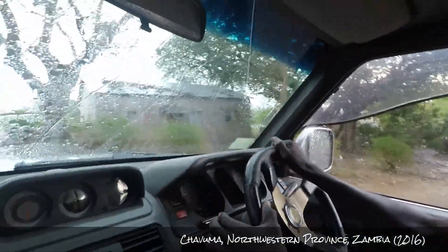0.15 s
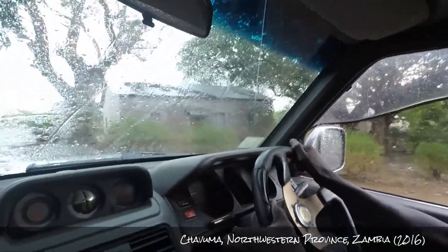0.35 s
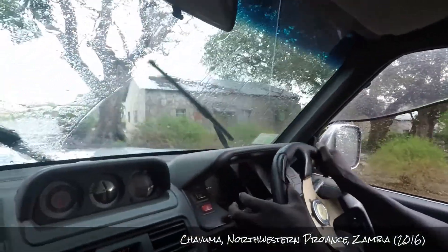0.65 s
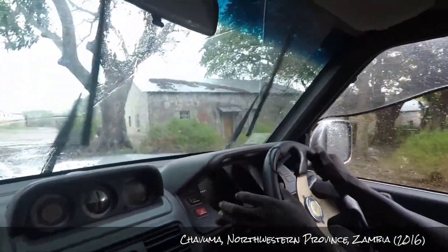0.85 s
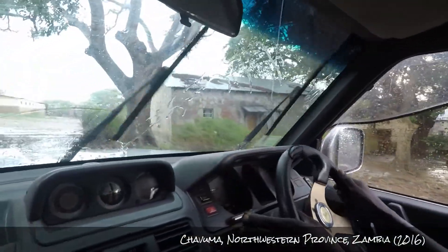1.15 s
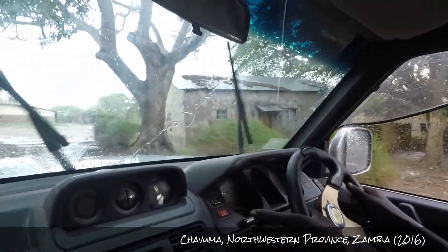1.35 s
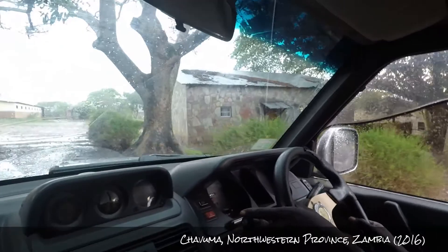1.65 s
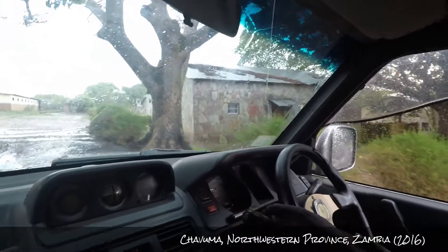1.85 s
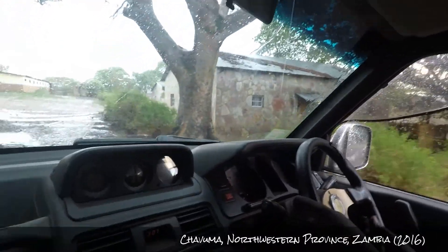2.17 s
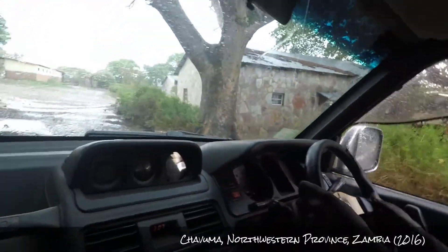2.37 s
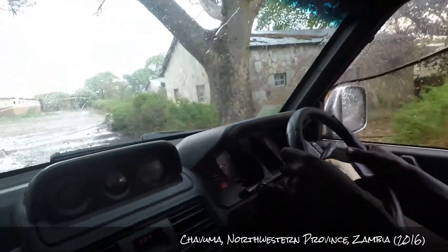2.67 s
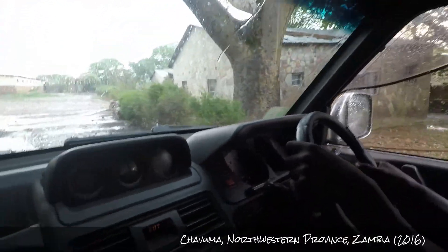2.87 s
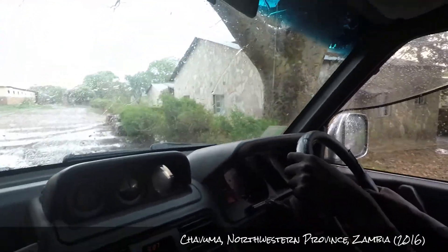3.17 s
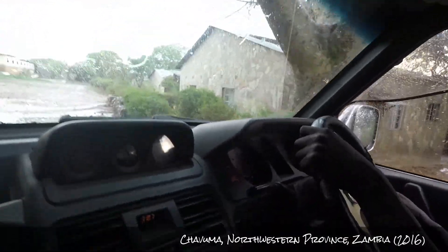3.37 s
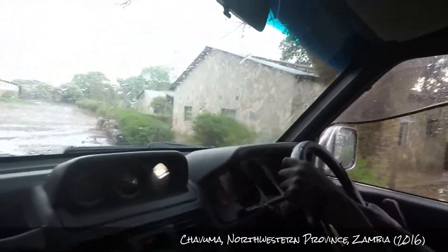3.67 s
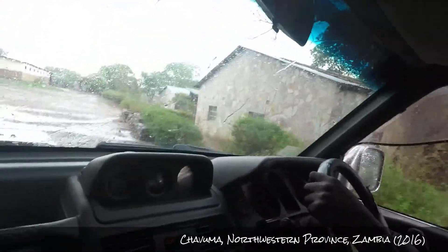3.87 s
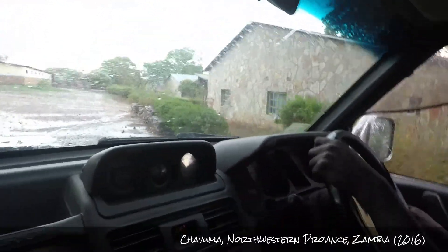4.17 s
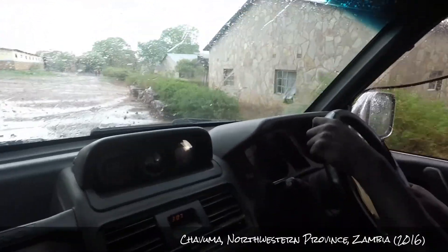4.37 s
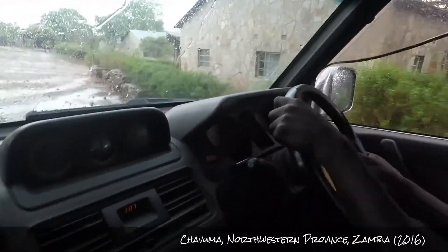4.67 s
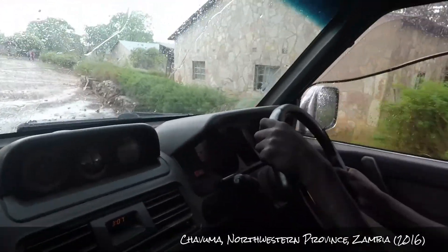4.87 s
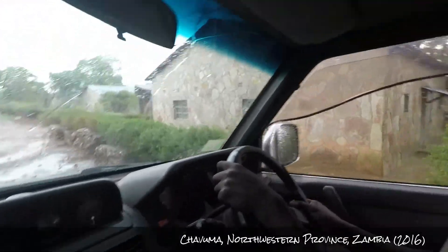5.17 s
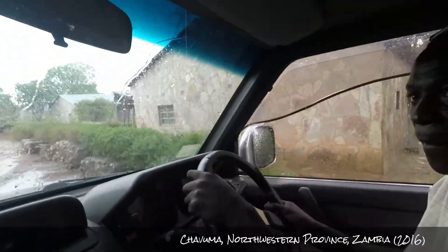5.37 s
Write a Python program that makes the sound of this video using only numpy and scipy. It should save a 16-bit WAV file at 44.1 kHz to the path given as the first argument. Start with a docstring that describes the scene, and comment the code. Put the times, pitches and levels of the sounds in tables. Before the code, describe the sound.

The cabin of a car rolling slowly over a wet dirt track, heard from a handheld camera at the passenger seat. A steady low engine drone around 50 Hz, boomy body rumble and tyre noise lie over soft, wide rain patter. Big drops tick at 0.03 and 0.75 s; a wiper taps softly at 1.2 s and flicks water just before 1.4 s. Sparse plastic rattles and faint high squeaks follow. From about 2.1 s the engine eases lower and weaker, with rut thuds near 2.45 s. A double dashboard knock at 2.8 s opens a busy run of clatter until 3.4 s. At 3.72 s a hard click and deep falling thump hit the camera, with body heave and water splash; all sound ducks abruptly, then recovers over almost two seconds. Rattles and a knock follow around 3.8 s, low thuds and puddle splashes at 4.6-4.9 s, smaller splashes near 5.4 s, and final rattles at 5.5 s.

```python
"""A low engine drone under pattering rain is heard first, inside a car rolling slowly over a dirt track.
The drone is a sum of sinusoidal orders with pulsed noise; rain, splashes and tyres are shaped noise.
Ruts, knocks and trim add decaying modes, chattering noise bursts and gliding stick-slip whistles.
A hard jolt knocks the camera: damped modes and a falling thump drive its limiter, which ducks everything
at once and takes almost two seconds to come back up."""
import sys
import numpy as np
from scipy import signal
from scipy.fft import rfft, irfft, next_fast_len
from scipy.io import wavfile
from scipy.ndimage import uniform_filter1d, minimum_filter1d

SR = 44100
rng = np.random.default_rng(int(sys.argv[2]) if len(sys.argv) > 2 else 0)


def pcm_store(signal):
    """Save signal as 16-bit PCM."""
    levels = np.round(np.clip(np.atleast_2d(signal), -1, 1) * 32767)
    wavfile.write(sys.argv[1], SR, levels.astype(np.int16).T)


N = 243873
T = np.arange(N) / SR  # t/s

# Spectra give a relative shape: the coloured noise is normalised afterwards.
# Cabin sound field, side relative to mid: f/Hz, level/dB
CABIN_WIDTH = [(60, -23), (170, -19.5), (300, -16), (510, -8), (860, -2.5), (1470, -2), (2500, -4.5),
               (4250, -7), (6000, 1.5), (8000, 1.5)]
# Cabin's lean to one microphone, left minus right: f/Hz, level/dB
CABIN_LEAN = [(120, 0), (280, -0.5), (520, -2), (1000, -0.6), (2000, 1.5), (4000, 1.5), (8000, 0)]

# Water reaching the body, rain and steady wheel spray, before the jolt's splash: t/s, level/dB
WATER = [(0, -42), (0.75, -42), (0.95, -44), (2.05, -42.5), (2.82, -43), (3.05, -40.5), (3.42, -40.5),
         (3.65, -42), (4.1, -42), (4.5, -42), (5.3, -44), (5.53, -40)]
# Spectrum of rain: f/Hz, level/dB per Hz
RAIN_SPECTRUM = [(200, -9), (600, 5.5), (1000, 7.5), (1250, 7), (1450, 9.5), (2000, 5.5), (2800, 3),
                 (4300, 1), (5700, 0.5), (7000, -7.5), (8200, -16.5), (10500, -21), (12000, -27),
                 (15000, -43)]
# Water thrown up by the jolt: rise of level/dB, settling t/s
SPLASH_DB, SPLASH_S = 12.5, 0.12

# Engine, eased off over the rough stretch: t/s, mean firing rate f/Hz, relative level/dB
ENGINE = [(0, 52, -12), (1.8, 51.7, -13.3), (2.1, 49.7, -12.5), (2.45, 41, -16), (2.8, 40, -22),
          (3.6, 38, -22), (4.4, 51, -26), (5.53, 52, -23)]
# Engine orders (half orders: unequal cylinders; 4.15: belt-driven fan): multiple of firing rate, level/dB
ENGINE_ORDERS = [(1, -1.5), (2, -18.5), (3, -35), (4.15, -26), (6, -37), (7, -38), (8, -40), (9, -41),
                 (11, -38), (11.5, -42), (13, -41), (14, -43.5)]
# Spectrum of combustion noise: f/Hz, level/dB per Hz
COMBUSTION_SPECTRUM = [(100, -8.5), (220, 2.5), (400, -6.5), (600, -9.5), (900, -14), (2000, -20.5),
                       (8000, -81)]

# Roughness of the track, over smooth ground: t/s, level/dB
ROUGHNESS = [(0, -0.5), (1.2, 0.4), (1.8, 1), (2.78, 0), (2.92, 5), (3.3, 4), (3.6, 1.5), (4.1, 0),
             (4.8, 1.5), (5.53, -1)]
# Spectrum of the body's boom: f/Hz, level/dB per Hz
BOOM_SPECTRUM = [(10, -22.5), (15, -9.5), (22, 1), (31, 3.5), (42, -3), (60, -3.5), (90, -19.5), (200, -72),
                 (2000, -130)]
# Spectrum of the tyres' rumble: f/Hz, level/dB per Hz
TYRE_SPECTRUM = [(12, -23), (35, 0.5), (70, 2.5), (130, 0.5), (180, -8.5), (260, -16), (370, -18.5),
                 (550, -25), (1000, -33.5), (2500, -68.5), (10000, -110)]
BOOM_DB, TYRE_DB = -15.5, -23  # on smooth ground, level/dB
# Heaving of the body after the jolt: rise of level/dB, settling t/s
HEAVE_DB, HEAVE_S = 6.5, 0.11

# Puddles splashing under the wheels: t/s, decay t/s, level/dB
PUDDLES = [(4.587, 0.037, -36.5), (4.71, 0.02, -39.5), (4.745, 0.018, -38.5), (4.791, 0.056, -41.5),
           (4.9, 0.024, -38.5), (5.357, 0.031, -43.5), (5.396, 0.024, -42)]
# Spectrum of a splash: f/Hz, level/dB per Hz
SPLASH_SPECTRUM = [(300, -8.5), (900, 12.5), (2500, 10.5), (5800, 7.5), (7500, -4.5), (10500, -27),
                   (15000, -56)]
# Big single drops on the windscreen: t/s, level/dB
BIG_DROPS = [(0.033, -33.5), (0.757, -34)]

# Water flicked over the glass by the returning blades: t/s, relative level/dB
WIPER_FLICKS = [(1.338, -32), (1.389, -30.5)]
# Spectrum of a flick: f/Hz, level/dB per Hz
FLICK_SPECTRUM = [(3000, -16), (4400, 0), (4900, 0), (5400, 11), (6000, 1), (6800, -11), (8000, -32),
                  (14000, -65)]
# Spectrum of the tap as the blades flip over: f/Hz, level/dB per Hz
FLIP_SPECTRUM = [(200, 11), (330, 22.5), (600, 6), (1400, 6), (2200, 1.5), (3000, -10.5), (6000, -22),
                 (14000, -58)]
FLIP_S, FLIP_DB = 1.208, -25.5  # top of the stroke: t/s, level/dB

# Trim rubbing on trim: t/s, length t/s, mid-glide f/Hz, fall in f/Hz, relative level/dB
SQUEAKS = [(1.872, .05, 4075, 20, -43), (2.306, .03, 4180, 60, -41), (2.873, .028, 4080, 30, -38.5),
           (2.901, .03, 4080, 50, -36), (3.511, .026, 4190, 70, -30.5), (3.533, .017, 4070, 170, -28.5),
           (3.77, .022, 4190, 40, -32.5), (4.625, .048, 4085, 70, -33.5), (4.781, .022, 4090, 0, -38.5),
           (5.048, .026, 4170, -130, -41.5)]

# Loose trim shaken by harder bumps: t/s, level/dB, decay t/s, bright edge against clatter level/dB
RATTLES = [(0.675, -32, 0.011, -9), (1.328, -37, 0.0053, -20), (1.364, -29, 0.013, -24),
           (1.576, -28, 0.0051, -16.5), (2.071, -28, 0.016, -14), (2.384, -26.5, 0.032, -14.5),
           (2.498, -27.5, 0.011, -17.5), (2.877, -28.5, .01, -17), (2.897, -27.5, 0.0098, -17),
           (2.947, -23, 0.016, -14), (3.002, -21.5, 0.013, -18.5), (3.119, -22, 0.0085, -16),
           (3.173, -22.5, 0.011, -19), (3.218, -26, 0.016, -15.5), (3.28, -22, 0.014, -17.5),
           (3.336, -24, 0.012, -23), (3.364, -30, 0.01, -11), (3.405, -28, 0.012, -18),
           (3.754, -22, .014, -9), (3.806, -17.5, 0.01, -14), (3.847, -26, 0.01, -22),
           (3.882, -26.5, 0.028, -8), (4.005, -34.5, 0.034, -25), (4.855, -31.5, 0.033, -14),
           (4.898, -33, 0.013, -13), (4.994, -32.5, 0.0056, -10), (5.102, -29.5, 0.033, -11.5),
           (5.186, -31, 0.016, -12), (5.489, -28.5, 0.0065, -15), (5.514, -23.5, 0.0054, -28)]
# Spectrum of dull clatter: f/Hz, level/dB per Hz
CLATTER_SPECTRUM = [(150, 13), (400, 6), (900, 2), (1900, -1), (2800, -10), (4500, -24), (8000, -64.5),
                    (14000, -61)]
# Spectrum of a bright edge: f/Hz, level/dB per Hz
EDGE_SPECTRUM = [(1500, -20.5), (3000, 9), (4500, 2.5), (5800, 8), (7500, -10.5), (9000, -31), (15000, -50)]
# Light random rattles: mean number per second, level/dB on smooth ground, spread of level/dB
CHATTER_PER_S, CHATTER_DB, CHATTER_SPREAD_DB = 6.6, -37, -2
LIGHT_EDGE_DB = -21.5  # bright edge of a light rattle against its clatter, level/dB

# Something loose knocking on the dashboard: t/s, level/dB
KNOCKS = [(2.8234, -16.5), (2.832, -15.5), (3.225, -28), (3.439, -21.5), (3.853, -23)]
# Dashboard modes: f/Hz, t60 t/s, level/dB
DASH_MODES = [(335, 0.042, -12), (410, 0.062, -3), (583, 0.033, -7), (707, 0.064, -12), (906, 0.029, -3.5),
              (1135, 0.13, -10), (1426, 0.033, -10.5)]
# Wheels dropping into ruts: t/s, thud f/Hz, relative level/dB
RUTS = [(2.418, 138, -9), (2.499, 68.5, -1), (3.126, 78, -21), (3.549, 150.2, -10), (4.011, 154, -8.5),
        (4.274, 136, -14), (4.665, 69, 0), (4.885, 109.6, -5)]

# Modes of the knocked camera case: f/Hz, t60 t/s, relative level/dB
CASE_MODES = [(333, 0.021, -8), (600, 0.0093, -12), (1083, 0.008, -20), (1470, 0.03, -15.5),
              (2530, .008, -33), (5300, 0.006, -28.5), (5950, 0.012, -26.5)]
JOLT_S, BOUNCE_S, THUMP_S = 3.7175, 3.7202, 3.7226  # t/s
SWELL_S = 0.087  # from the jolt to the top of heave and splash, t/s
TOP_HZ = 15500  # upper limit of the output, f/Hz


def undb(db):
    """Definition of the decibel: level to amplitude ratio."""
    return 10 ** (np.asarray(db) / 20)


def unit(x):
    """Normalisation to an rms amplitude of 1."""
    return x / np.sqrt(np.mean(x ** 2))


def curves(table):
    """Linear interpolation of each column through time."""
    s, *columns = np.transpose(table)
    return [np.interp(T, s, column) for column in columns]


def colour(x, points):
    """Zero-phase filtering: levels run straight between the points over log frequency."""
    hz, db = np.transpose(points)
    size = next_fast_len(N)
    bins = np.maximum(np.fft.rfftfreq(size, 1 / SR), 1)
    gain = undb(np.interp(np.log(bins), np.log(hz), db))
    return irfft(rfft(x, size) * gain, size)[..., :N]


def noise():
    """Statistical independence: two unrelated white noises."""
    return rng.standard_normal((2, N))


def cabin(pair, points):
    """Diffuse-field coherence: mid and side make bass alike in both channels and treble diffuse."""
    mid, side = colour(pair, points)
    side = colour(side, CABIN_WIDTH)
    left = colour(mid + side, [(hz, db / 2) for hz, db in CABIN_LEAN])
    right = colour(mid - side, [(hz, -db / 2) for hz, db in CABIN_LEAN])
    return np.array([left, right]) / np.std(mid)


def pan(db):
    """Interchannel level difference, left minus right, split evenly between the channels."""
    return undb(np.array([[db], [-db]]) / 2)


def walk(rate):
    """Low-pass randomness: held random steps, rate per second, smoothed twice and scaled to rms 1."""
    k = int(SR / rate)
    steps = rng.standard_normal(N)[np.arange(N) // k]
    return unit(uniform_filter1d(uniform_filter1d(steps, k), k))


def burst(start, rise, decay):
    """Exponential relaxation: a linear rise to 1, then decay with the given time constant."""
    age = T - start
    return np.clip(age / rise, 0, 1) * np.exp(-np.clip((age - rise) / decay, 0, 60))


def grains(per_s, spread_db):
    """Random impulse trains: two unrelated streams of unequal tiny clicks, rms 1."""
    sizes = undb(spread_db * np.minimum(rng.exponential(size=(2, N)), 5))
    struck = rng.random((2, N)) < per_s / SR
    return unit(struck * sizes * np.sign(noise()))


def tap(points, start, rise, decay):
    """Impulsive noise: one short coloured burst with the rms of its envelope."""
    shape = burst(start, rise, decay)
    return unit(cabin(noise(), points) * shape) * np.sqrt(np.mean(shape ** 2))


def ring(start, hz, t60):
    """Damped free vibration: one struck mode falling 60 dB in t60 seconds."""
    out, first = np.zeros(N), int(start * SR) + 1
    age = T[first:first + int(2 * t60 * SR)] - start
    out[first:first + len(age)] = np.sin(2 * np.pi * hz * age) * np.exp(-np.log(1000) * age / t60)
    return out


def rain(water_db, drops_per_s=550, spread_db=3.0, ring_s=0.0032):
    """Random impact excitation: unequal drops tap roof and glass over the wash of countless finer ones."""
    taps = grains(drops_per_s, spread_db)
    age = T[:1024]
    panel = rng.standard_normal((2, len(age))) * np.exp(-age / ring_s)
    # the panels smear each tap in time and leave its colour flat
    response = rfft(panel)
    smear = irfft(response / np.abs(response))
    patter = unit(signal.fftconvolve(taps, smear, axes=1)[:, :N])
    water = undb(-5.5) * patter + undb(-1.5) * noise()
    return cabin(water, RAIN_SPECTRUM) * undb(water_db + 0.56 * walk(24.45))


def engine(wobble=0.0026, load_db=0.34, combustion_db=-26):
    """Harmonic synthesis: a four-cylinder's orders follow the crankshaft; each firing puffs noise."""
    hz, db = curves(ENGINE)
    phase = 2 * np.pi * np.cumsum(hz * (1 + wobble * walk(12))) / SR
    note = np.zeros(N)
    for multiple, order_db in ENGINE_ORDERS:
        amplitude = undb(order_db + load_db * walk(7.92))
        note += amplitude * np.sin(multiple * phase + rng.uniform(0, 2 * np.pi))
    combustion = cabin(noise(), COMBUSTION_SPECTRUM) * (1 + 0.4 * np.cos(phase))
    return (np.sqrt(2) * note * pan(2.1) + undb(combustion_db) * combustion) * undb(db)


def body_boom(shake_db):
    """Forced vibration: ground roughness makes the sprung body boom as low-frequency noise."""
    return cabin(noise(), BOOM_SPECTRUM) * undb(BOOM_DB + shake_db) * pan(1.8)


def tyre_rumble(shake_db):
    """Roughness excitation: tyre noise surges over the uneven ground."""
    return cabin(noise(), TYRE_SPECTRUM) * undb(TYRE_DB + shake_db + 1.53 * walk(21.7)) * pan(0.77)


def puddle_splashes(rise_s=0.011, drops_per_s=3000):
    """Superposed impacts: puddles throw short showers of droplets at the body."""
    showers = sum(undb(db) * burst(s, rise_s, decay) for s, decay, db in PUDDLES)
    return showers * cabin(grains(drops_per_s, spread_db=0.5), SPLASH_SPECTRUM)


def big_drops(tap_s=0.0021):
    """Single impact: a big drop ticks on the glass as a brief bright noise."""
    ticks = sum(undb(db) * burst(s, 0.0009, tap_s) for s, db in BIG_DROPS)
    return ticks * cabin(noise(), EDGE_SPECTRUM)


def wiper(flick_db=-1.0):
    """Elastic reversal: the rubber lips flip over with a soft tap, then flick water off the glass."""
    flip = tap(FLIP_SPECTRUM, FLIP_S, 0.005, 0.01)
    flicks = sum(undb(db) * tap(FLICK_SPECTRUM, s, 0.0018, 0.0035) for s, db in WIPER_FLICKS)
    return undb(FLIP_DB) * flip + undb(flick_db) * flicks


def squeaks(waver_hz=16, third_db=-33, flutter_db=0.5):
    """Stick-slip friction: short whistles with a faint third harmonic bite quickly, glide and fade."""
    out = np.zeros(N)
    waver, flutter = waver_hz * walk(240), undb(flutter_db * walk(200))
    for s, length, hz, fall_hz, db in SQUEAKS:
        along = np.clip((T - s) / length, 0, 1)
        phase = 2 * np.pi * np.cumsum(hz + fall_hz * (0.5 - along) + waver) / SR
        grip = np.interp(along, [0, 0.25, 1], [0, 1, 0]) ** 0.8
        out += undb(db) * grip * (np.sin(phase) + undb(third_db) * np.sin(3 * phase))
    return out * flutter * pan(-4.0)


def rattles(rough_db, rise_s=0.0028, light_decay_s=0.015, contacts_per_s=6000):
    """Repeated contact: loose plastic chatters, dull with a bright edge; light rattles follow roughness."""
    kicked = rng.random(N) < CHATTER_PER_S / SR
    kicks = kicked * undb(CHATTER_DB + rough_db + CHATTER_SPREAD_DB * rng.standard_normal(N))
    light = signal.fftconvolve(kicks, burst(0, rise_s, light_decay_s))[:N]
    clatter, edge = light, undb(LIGHT_EDGE_DB) * light
    for s, db, decay, edge_db in RATTLES:
        blow = undb(db) * burst(s, rise_s, decay)
        clatter = clatter + blow
        edge = edge + undb(edge_db) * blow
    contacts = grains(contacts_per_s, spread_db=1.5)
    return clatter * cabin(contacts, CLATTER_SPECTRUM) + edge * cabin(noise(), EDGE_SPECTRUM)


def dashboard_knocks():
    """Modal excitation: a loose thing strikes the dashboard; each mode reaches the sides differently."""
    knocks = np.zeros((2, N))
    for s, db in KNOCKS:
        onset = np.clip((T - s) / 0.0019, 0, 1)
        for hz, t60, mode_db in DASH_MODES:
            for side in range(2):
                delay = rng.uniform(0, 0.00088)
                knocks[side] += undb(db + mode_db) * ring(s + delay, hz, t60) * onset
    return knocks


def rut_thuds():
    """Transient response: each drop into a rut sets one low, softly starting body mode ringing."""
    thuds = sum(undb(db) * ring(s, hz, 0.17) * np.clip((T - s) / 0.0092, 0, 1) for s, hz, db in RUTS)
    return thuds * pan(1.8)


def case_click(bounce_db=-6):
    """Modal superposition: the camera's case is struck and bounces once."""
    click = np.zeros(N)
    for s, hit_db in [(JOLT_S, 0), (BOUNCE_S, bounce_db)]:
        for k, (hz, t60, db) in enumerate(CASE_MODES):
            # neighbouring modes start in opposite directions, so they merge into one full knock
            click += (-1) ** k * undb(db + hit_db) * ring(s, hz, t60)
    return colour(click, [(6500, -4.0), (9000, -16), (14000, -19)])


def camera_thump():
    """Contact stiffness: the body thumps the microphones, dropping in pitch as the contact slackens."""
    age = np.maximum(T - THUMP_S, 0)
    hz = 28 + 125 * np.exp(-age / 0.0052)
    return np.sin(2 * np.pi * np.cumsum(hz * (age > 0)) / SR) * burst(THUMP_S, 0.003, 0.007)


def jolt(crunch_db=-18, crunch_s=0.0018):
    """Impact: the camera's case clicks with a brief crunch, then its whole body thumps."""
    crunch = unit(colour(noise()[0], CLATTER_SPECTRUM)) * burst(JOLT_S, 0.00044, crunch_s)
    knock = undb(1.5) * case_click() + undb(crunch_db) * crunch + undb(19.0) * camera_thump()
    return knock * pan(-8.0)


def scene():
    """Linear superposition: everything heard from the passenger seat, from background to jolt."""
    rough_db, = curves(ROUGHNESS)
    shake_db = rough_db + HEAVE_DB * burst(JOLT_S, SWELL_S, HEAVE_S)
    water_db = curves(WATER)[0] + SPLASH_DB * burst(JOLT_S, SWELL_S, SPLASH_S)
    steady = rain(water_db) + engine() + body_boom(shake_db) + tyre_rumble(shake_db)
    water_events = puddle_splashes() + big_drops() + wiper()
    trim = squeaks() + rattles(rough_db)
    return steady + water_events + trim + dashboard_knocks() + rut_thuds() + jolt()


def limit(x, ceiling_db, recovery, ahead_s):
    """Look-ahead limiting: ducks before a peak, then comes back at recovery dB a second."""
    over_db = np.maximum(20 * np.log10(np.abs(x).max(axis=0) + 1e-9) - ceiling_db, 0)
    cut_db = np.maximum.accumulate(over_db + recovery * T) - recovery * T
    k = max(int(ahead_s * SR), 2)
    gain = uniform_filter1d(undb(-cut_db), k, origin=-(k // 2))
    return x * gain


def compress(x, threshold_db, window_s):
    """Envelope compression: quick gain control holds down bass swells above the threshold."""
    bass = colour(x, [(90, 0), (200, -8), (400, -40)])
    envelope = np.abs(signal.hilbert(np.mean(bass, axis=0)))
    over_db = np.maximum(20 * np.log10(envelope + 1e-9) - threshold_db, 0)
    k = int(window_s * SR)
    gain = uniform_filter1d(minimum_filter1d(undb(-over_db), k), k)
    return x - bass + bass * gain


def record(dry):
    """Dynamic range control: a slow limiter catches the jolt, a compressor evens bass; the top is cut."""
    ducked = limit(dry, ceiling_db=1.0, recovery=12, ahead_s=0.003)
    even = compress(ducked, threshold_db=-6.0, window_s=0.012)
    clipped = np.clip(even, -0.96, 0.96)
    low_pass = signal.ellip(8, 0.2, 70, TOP_HZ, fs=SR, output="sos")
    return signal.sosfilt(low_pass, clipped)


dry = scene()
out = record(dry)
pcm_store(out)
```